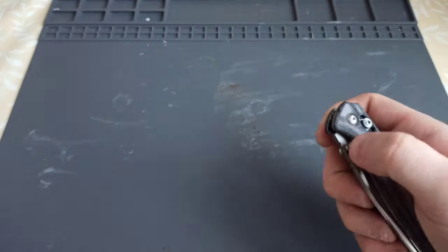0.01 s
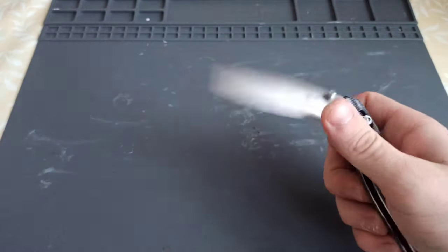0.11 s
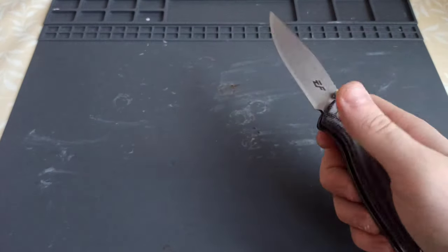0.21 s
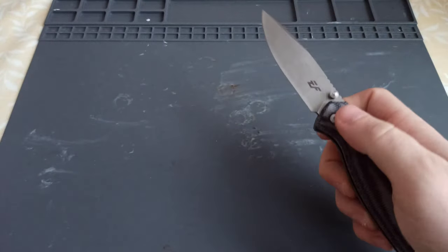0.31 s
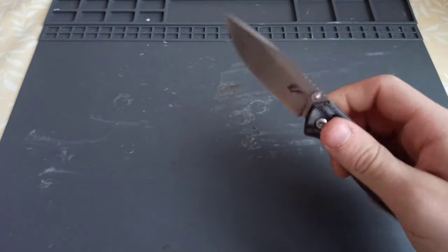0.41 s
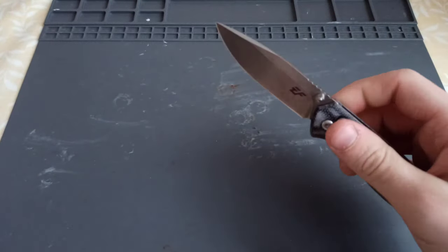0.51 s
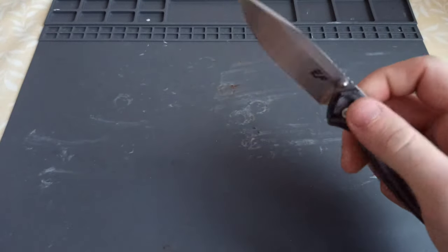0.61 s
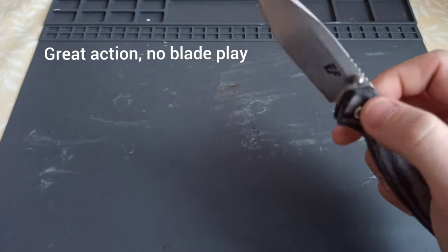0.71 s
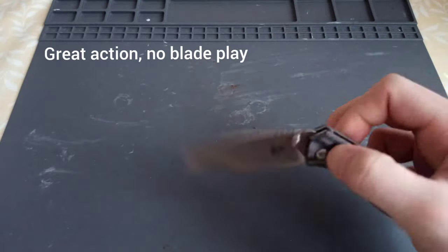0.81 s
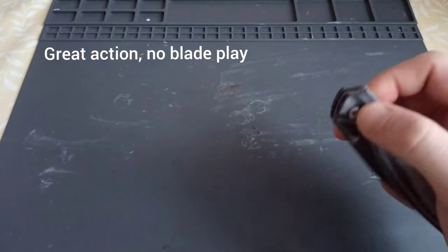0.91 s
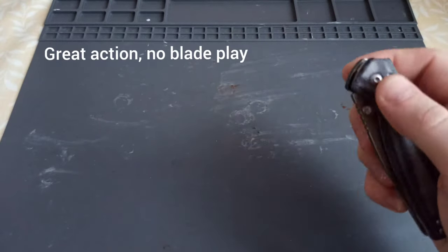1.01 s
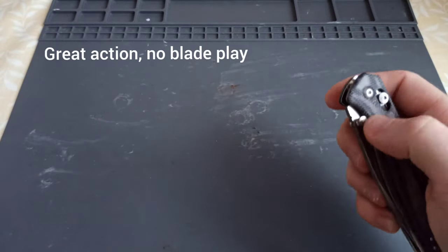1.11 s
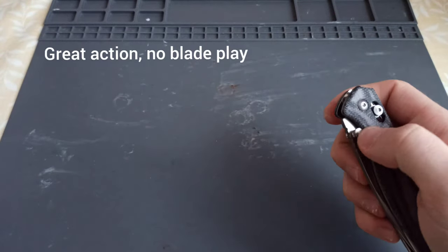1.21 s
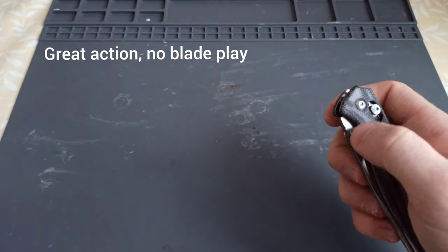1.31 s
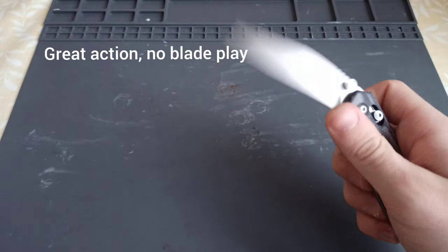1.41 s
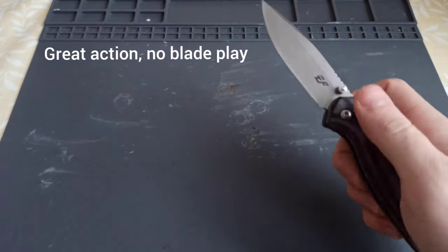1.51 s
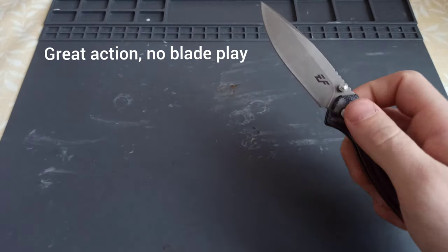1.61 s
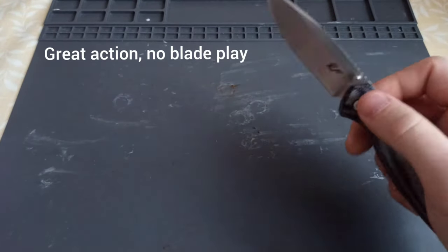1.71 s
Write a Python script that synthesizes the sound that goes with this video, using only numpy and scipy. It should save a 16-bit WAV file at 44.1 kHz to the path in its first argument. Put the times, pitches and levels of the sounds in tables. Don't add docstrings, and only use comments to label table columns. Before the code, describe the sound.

A folding knife is handled close to a phone microphone in a small quiet room. At about 0.13 s the blade rasps briefly on its pivot and locks with a sharp chattering snap at 0.2. Faint ticks from 0.8 lead to a bright steel clack shut near 0.96 with a tiny rattle. Soft finger rubs follow around 1.2, then another rasp at 1.43 and hard lock snap at 1.5. Short tails, faint hiss.

```python
import sys
import numpy as np
from scipy import signal
from scipy.io import wavfile

SR = 44100
rng = np.random.default_rng(int(sys.argv[2]) if len(sys.argv) > 2 else 0)


def invert_db(x):
    u = np.asarray(x, float) / 20
    return 10 ** u


def digitize_waveform(pressure):
    field = np.atleast_2d(pressure).T
    bounded = np.clip(field, -1, 1)
    quanta = np.round(bounded * 32767).astype(np.int16)
    wavfile.write(sys.argv[1], SR, quanta)


N = 79380

# pitch_hz, level_db (per Hz)
LOW_NOISE = [(20, -20.5), (52, -15.5), (75, -2), (120, -0.5), (250, -2.5), (500, -9), (1200, -17.5),
             (4500, -42.5)]
HIGH_NOISE = [(3000, -2), (4200, 0.5), (5400, -11.5), (6700, 1.5), (8400, -10), (8800, -28), (11300, -28),
              (11700, -6)]
# pitch_hz, time_to_fall_60_db_s
ROOM_DECAY = [(300, 0.54), (1000, 0.34), (2800, 0.29), (6500, .24), (12000, .19)]
# pitch_hz, level_db
ROOM_COLOUR = [(300, -4), (1000, -8), (2500, -9), (4000, -1), (6000, 0), (8000, -7), (13000, -2)]
ROOM_LEVELS = [-5, -8.5, -7]
# pitch_hz, level_db
MIC_PORT = [(200, -3.5), (5000, -2), (7500, 4), (8500, -1.5), (8900, -5.5), (11200, -16), (11700, -10),
            (15600, -13)]
# start_s, length_s, level_db, pitch_hz
RUBS = [
    (.40, 0.15, -70.5, 6844),
    (0.611, 0.062, -76.5, 6800),
    (0.798, 0.073, -70.5, 6790),
    (1.192, 0.035, -64, 3024),
    (1.234, 0.051, -63.5, 2900),
    (1.284, 0.036, -66.5, 3200),
    (1.224, .1, -73.5, 6800),
    (1.392, 0.1, -66.5, 3440),
]
# start_s, level_db, pitch_hz
BUMPS = [
    (.14, -38.5, 130.8),
    (.205, -50.5, 44.96),
    (1.235, -47, 250),
    (1.242, -48, 114),
    (1.496, -53, 40),
    (0.996, -48.5, 307),
    (1.526, -45, 330),
]
# start_s, length_s, level_db, pitch_factor
SWINGS = [
    (.134, 0.06, -40, 0.993),
    (1.425, 0.061, -39.5, 1.01),
]
# pitch_hz, width_hz, level_db, brevity (power), lateness (0 to 1)
PIVOT_MODES = [(2273, 190, -1, 4.4, 0.4), (3145, 190, 0.5, 1.3, .3), (3800, 600, -6, .6, 0.5),
               (6300, 400, -10, .8, 0.3), (7510, 1000, -8.5, .6, 0.7), (13200, 600, -7.5, .8, 0.6),
               (14000, 2000, -2.5, .7, .45)]
# start_s, level_db, pitch_hz, width_hz
TICKS = [(0.103, -53, 1600, 1522), (.126, -42.5, 1800, 2552), (0.1316, -41, 3630, 898),
         (.1318, -44, 6300, 711), (.788, -49.5, 4800, 2497), (.821, -57, 3800, 1200),
         (.833, -63.5, 7470, 245.3), (0.839, -58.5, 6500, 403), (0.8689, -53.5, 6800, 900),
         (0.882, -42, 6580, 700), (.8812, -54.5, 2300, 500), (0.8851, -36.5, 7100, 485),
         (0.8866, -48.5, 2290, 275), (0.8855, -36, 13400, 1800), (0.9455, -38, 13630, 203.5),
         (1.374, -53, 2470, 2420), (1.391, -45, 2170, 3110), (1.401, -54, 3493, 3040),
         (1.425, -36, 3520, 900), (1.4251, -37.5, 7600, 1010)]
# start_s, length_s, level_db
SHIVERS = [
    (0.969, 0.0062, -30),
    (0.984, .009, -39),
    (0.991, 0.013, -34),
]
# start_s, level_db
SHUT_HITS = [
    (.9432, -34.5),
    (.9449, -38),
    (.9597, -47),
    (.9647, -24.5),
    (.9659, -22.5),
    (.9667, -23),
    (.9682, -31),
    (.9695, -29.5),
]
# pitch_hz, width_hz, level_db
SHUT_MODES = [(452, 170, -15.5), (807, 253, -10.5), (2050, 200, -19.5), (3200, 360, -11.5), (4260, 460, -9),
              (5010, 440, -7), (6330, 330, -4.5), (7470, 890, 2), (7630, 400, 0.5), (11300, 900, -2.5),
              (12700, 900, 4), (14320, 700, 2)]
# pitch_hz, width_hz, level_db
OPEN_MODES = [(892, 155, -9.5), (1260, 160, -18), (1598, 180, -13.5), (2900, 590, -8.5), (3900, 390, -7.5),
              (4800, 980, -15.5), (5570, 1200, -8.5), (6423, 1200, 4.5), (7540, 180, -8.5),
              (8117, 400, -6.5), (12200, 700, -9), (13000, 1000, -2.5), (14800, 900, -4)]
# start_s, level_db
FIRST_LOCK = [
    (0.204, -34.5),
    (.2056, -22),
    (0.2062, -19),
    (0.2072, -23),
    (0.2085, -28.5),
    (0.2096, -26.5),
]
SECOND_LOCK = [
    (1.4933, -30.5),
    (1.4947, -23),
    (1.4966, -18),
    (1.4982, -27),
    (1.4998, -20.5),
    (1.5011, -34.5),
    (1.5058, -26),
    (1.5055, -34),
]
GRIP_TILT = [1, 0.5]


def evened(x):
    return x / np.sqrt(np.mean(x ** 2) + 1e-20)


def read(points, hz):
    f, value = np.transpose(points)
    return np.interp(np.log(hz + 1), np.log(f + 1), value)


def ring(x, hz, width):
    pole = np.exp((2j * np.pi * hz - np.pi * width) / SR)
    return signal.lfilter([1], [1, -pole], x).imag


def soft_ring(x, hz, width):
    rise = 4.36
    pole, rise_pole = np.exp((2j * np.pi * hz - np.pi * width * np.array([1, rise])) / SR)
    rung = signal.lfilter([1], np.poly([pole, rise_pole]), x)
    return 2 * (1 - abs(rise_pole)) * rung.imag


def clicks(rows):
    x = np.zeros(N)
    for start_s, level_db in rows:
        x[round(start_s * SR)] += invert_db(level_db)
    return x


def grit(per_s, spread_db):
    size = invert_db(spread_db * np.minimum(rng.exponential(1, N), 4))
    size = size * rng.choice([-1., 1.], N)
    return evened(size * (rng.random(N) < per_s / SR))


def swell(start, length, peak):
    u = np.clip((np.arange(N) / SR - start) / length, 0, 1)
    bend = np.log(.5) / np.log(np.clip(peak, .05, .95))
    return np.sin(np.pi * u ** bend) ** 2


def below(x, hz):
    return signal.oaconvolve(x, signal.firwin(401, hz, window=("kaiser", 8), fs=SR), "same")


def noise(points, level_db):
    frames, hz = N // 256 + 5, np.fft.rfftfreq(1024, 1 / SR)
    a, b = rng.standard_normal((frames, 513, 2)).T
    z = (a + 1j * b) * invert_db(read(points, hz)[:, None])
    return invert_db(level_db) * evened(signal.istft(z, nperseg=1024, noverlap=768)[1][:N])


def background():
    quiet = noise(LOW_NOISE, -66) + noise(HIGH_NOISE, -72.5)
    return signal.sosfilt(signal.butter(4, 69, "high", fs=SR, output="sos"), quiet)


def room(x):
    start_s, build_s, spin_hz = 0.0013, 0.01, 90.2
    echoes = np.zeros((2, 18000))
    at = np.arange(0, 17988, 12) + rng.integers(0, 12, (2, 1499))
    np.put_along_axis(echoes, at, rng.choice([-1., 1.], at.shape), axis=1)
    hz, t, z = signal.stft(echoes, SR, nperseg=128)
    fade_db = read(ROOM_COLOUR, hz)[:, None] - 60 * t / read(ROOM_DECAY, hz)[:, None]
    tail = signal.istft(z * invert_db(fade_db), SR, nperseg=128)[1]
    tail = tail * np.clip((np.arange(tail.shape[1]) / SR - start_s) / build_s, 0, 1)
    spin = 2 * np.pi * spin_hz * np.arange(N) / SR
    fed = x * np.array([np.cos(spin), np.sin(spin)])
    return signal.fftconvolve(fed, tail / np.linalg.norm(tail[0]), axes=1)[:, :N].sum(axis=0)


def port(x):
    gain = np.log(invert_db(read(MIC_PORT, abs(np.fft.fftfreq(4096, 1 / SR)))))
    response = np.fft.ifft(np.exp(np.conj(signal.hilbert(gain)))).real[:2048]
    return signal.fftconvolve(x, response)[:N]


def fingers():
    slips = grit(per_s=2400, spread_db=3.5)
    out = np.zeros(N)
    for start_s, length_s, level_db, hz in RUBS:
        rub = evened(ring(slips, hz, 0.45 * hz))
        out += invert_db(level_db) * swell(start_s, length_s, 0.34) * rub
    for start_s, level_db, hz in BUMPS:
        push = ring(clicks([(start_s, level_db)]), hz, 40)
        out += ring(push, hz, 60) * 300 / SR
    return out


def pivot():
    sag = 0.033
    out = np.zeros(N)
    for start_s, length_s, level_db, pitch in SWINGS:
        slips = grit(per_s=5000, spread_db=3.5)
        for k, (hz, width, db, brevity, late) in enumerate(PIVOT_MODES):
            press = swell(start_s, length_s, late)
            gliding_hz = hz * pitch * (1 - sag * (press - .5))
            turn = np.exp(2j * np.pi * np.cumsum(gliding_hz) / SR)
            r = np.exp(-np.pi * width / SR)
            band = turn * signal.lfilter([1], np.poly([r, r * r]), np.roll(slips, 997 * k) / turn)
            out += invert_db(level_db + db - 4.5) * press ** brevity * evened(band.real)
    return out


def ticks():
    out = np.zeros(N)
    for s, db, hz, width in TICKS:
        touches = clicks([(s, db), (s + 0.0013, db - 1), (s + 0.0036, db - 5)])
        out += soft_ring(touches, hz, width)
    return out


def shiver():
    slips = grit(per_s=6000, spread_db=4.5)
    rattle = np.zeros(N)
    for k, (hz, width, db) in enumerate(SHUT_MODES[3:]):
        rattle += invert_db(.6 * db) * soft_ring(np.roll(slips, 997 * k), hz, 2 * width)
    return evened(rattle) * sum(invert_db(db) * swell(s, n, .4) for s, n, db in SHIVERS)


def struck_knife(rows, modes, scatter_db, crack_db, tilt_db):
    heavy_below_hz, heavy_bias, push_db = 2000, 4.4, -10.5
    out = invert_db(crack_db) * np.diff(clicks(rows), prepend=0)
    s, level_db = np.transpose(rows)
    at = np.round(s * SR).astype(int)
    heavy_db = heavy_bias * (level_db - level_db.max())
    out[at] += invert_db(level_db + heavy_db + push_db)
    luck = rng.standard_normal((len(rows), len(modes), 2))
    for k, (hz, width, db) in enumerate(modes):
        x = np.zeros(N)
        if hz < heavy_below_hz:
            x[at] = (-1) ** k * invert_db(heavy_db)
        else:
            x[at] = np.sign(luck[:, k, 0]) * invert_db(scatter_db * luck[:, k, 1])
        x[at] *= invert_db(level_db + db)
        out += invert_db(tilt_db * np.log2(hz / 7000)) * soft_ring(x, hz, width)
    return out


def shutting():
    return struck_knife(SHUT_HITS, SHUT_MODES, scatter_db=1.5, crack_db=-14, tilt_db=0)


def lock(rows, tilt_db):
    return struck_knife(rows, OPEN_MODES, scatter_db=4.0, crack_db=-12, tilt_db=tilt_db)


def scene():
    first, second = lock(FIRST_LOCK, GRIP_TILT[0]), lock(SECOND_LOCK, GRIP_TILT[1])
    shut, rattle = shutting(), shiver()
    small = ticks() + pivot() + fingers()
    lock_db, shut_db, small_db = ROOM_LEVELS
    tails = invert_db(lock_db) * room(first) + invert_db(lock_db) * room(second)
    tails += invert_db(shut_db) * room(shut + rattle) + invert_db(small_db) * room(small)
    gentle = below(background() + port(tails + small + rattle), 15650)
    return (port(first + second + shut) + gentle)[None]


def roll_off(x):
    return signal.sosfilt(signal.butter(12, 16470, fs=SR, output="sos"), x)


def record(dry):
    smear_db, smear_s, edge_hz = -20, .005, 16300
    t = np.arange(-700, 701) / SR
    smear = rng.standard_normal(len(t)) * np.exp(-abs(t) / smear_s) * (t < 0)
    smear = smear / np.linalg.norm(smear)
    x = dry[0] + invert_db(smear_db) * signal.oaconvolve(dry[0], smear, "same")
    return roll_off(below(x, edge_hz)[None])


dry = scene()
out = record(dry)
digitize_waveform(out)
```